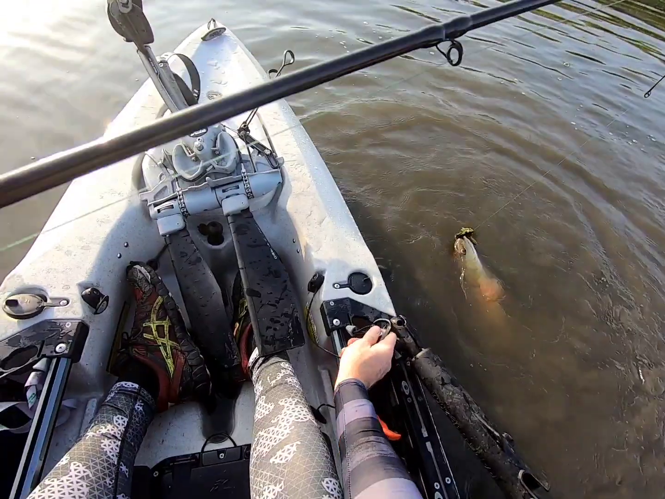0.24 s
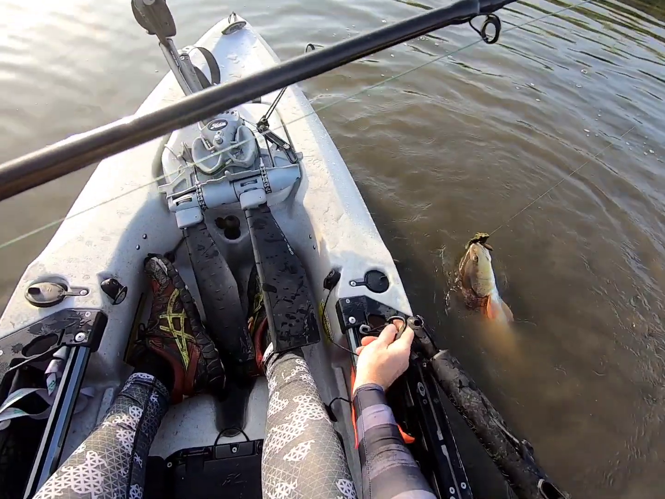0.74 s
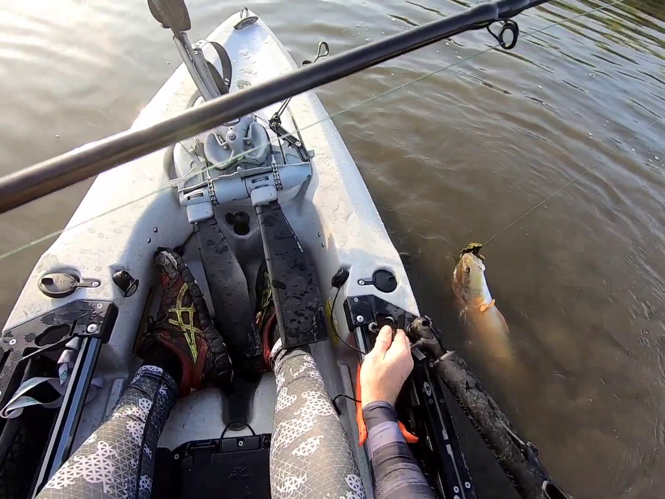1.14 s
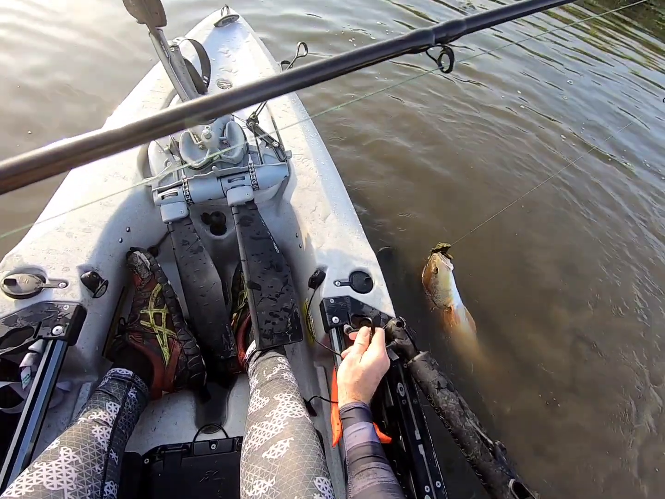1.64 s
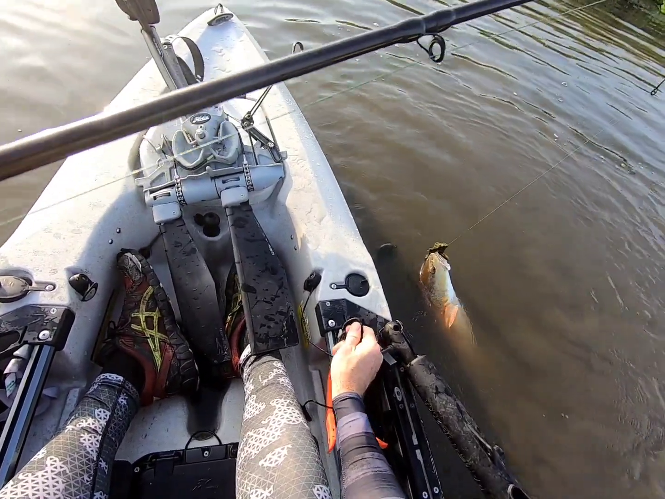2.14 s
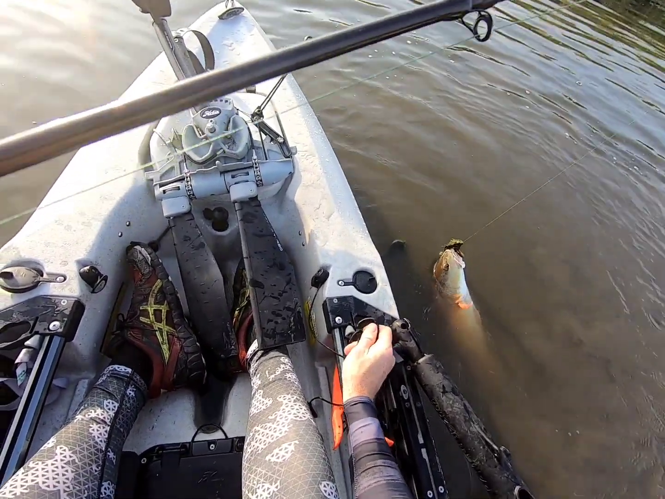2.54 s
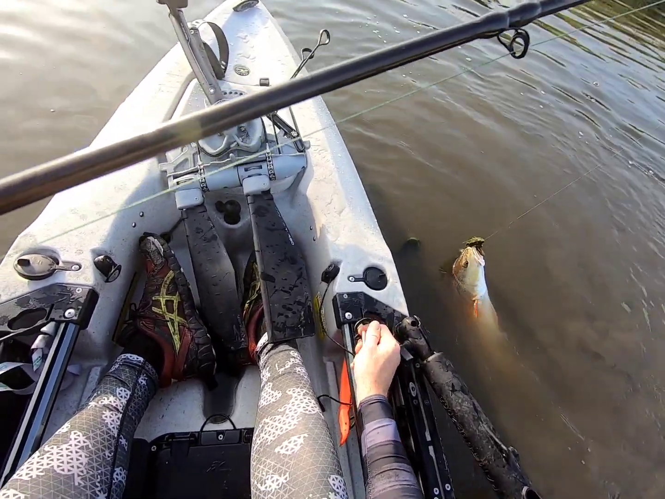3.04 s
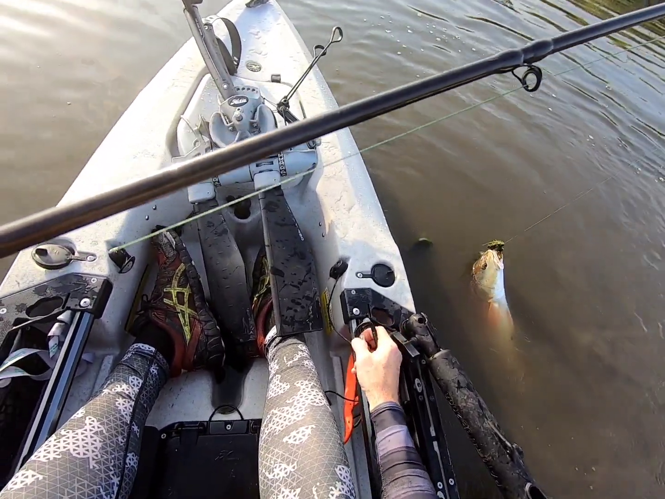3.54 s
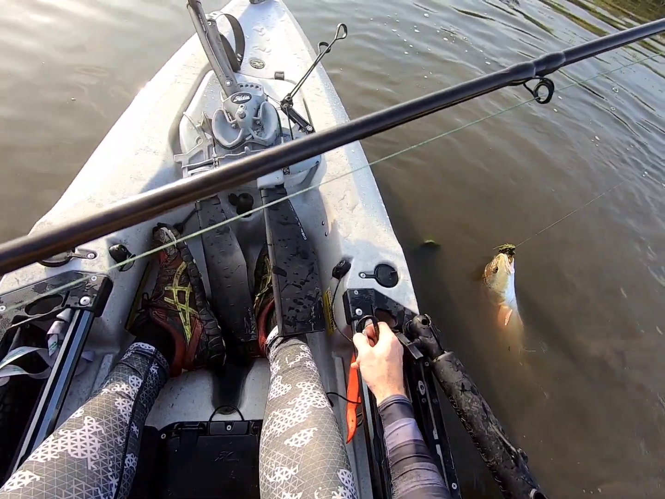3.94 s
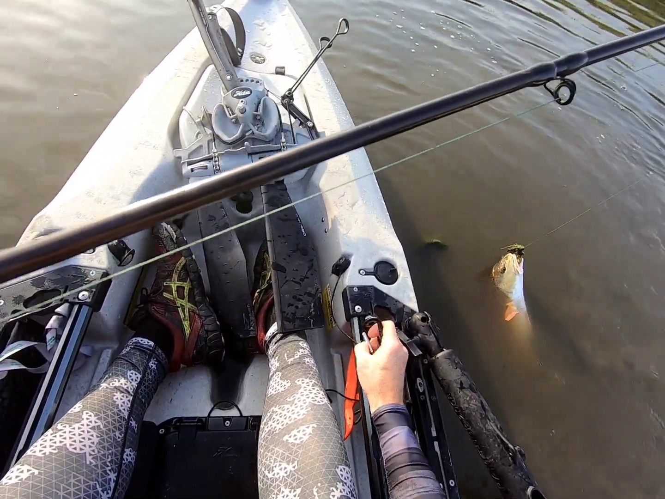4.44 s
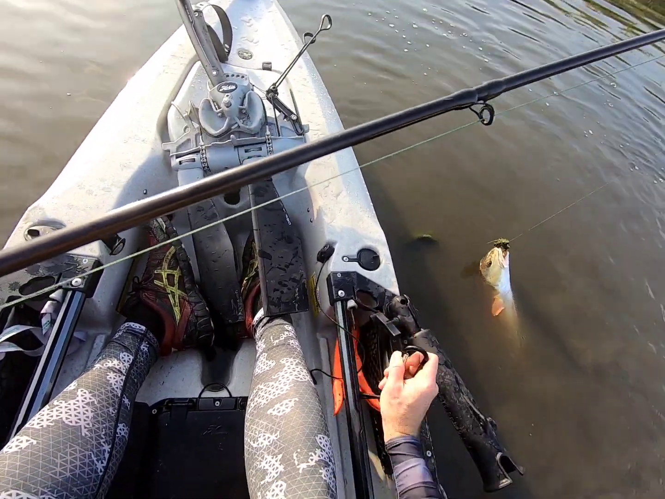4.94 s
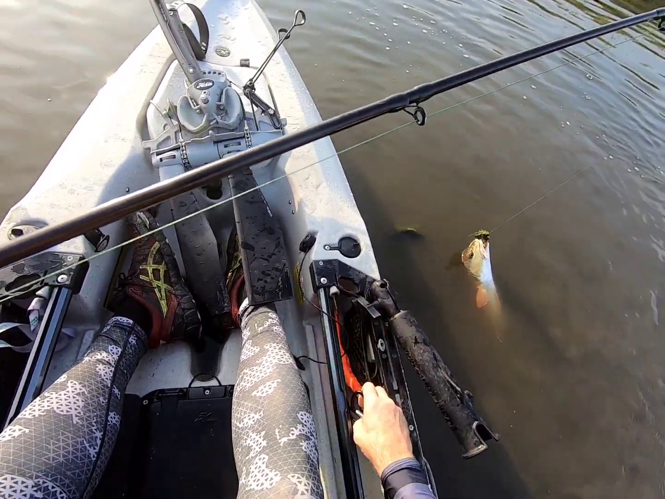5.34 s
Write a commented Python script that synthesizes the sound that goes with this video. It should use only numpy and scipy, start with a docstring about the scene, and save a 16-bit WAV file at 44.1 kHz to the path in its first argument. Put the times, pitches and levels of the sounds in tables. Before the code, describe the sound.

Outdoors on calm water, a dense insect chorus holds one thin, high pitch, stronger on the right. Wind thumps low and unevenly, mostly on the left of a close, body-worn-style stereo microphone. Small knocks, ticks and cloth rubs come from a plastic kayak, with a few watery plips. Activity thins mid-way, then rummaging builds to a loud double clunk at the very end.

```python
"""On a marsh, a kayak drifts amid a dense insect chorus near 7 kHz, heard mostly to the right.
Narrow-band noise makes the chorus; low noise and single pulses make wind buffet the microphone ports.
Filtered noise makes the rustle of an angler's sleeve, the hush of the marsh and water under the hull.
Damped sines ring as drops, ticking tackle and the plastic hull, which gear scrapes and knocks,
hardest at the end."""
import sys
import numpy as np
from scipy import signal
from scipy.fft import rfft, irfft, next_fast_len
from scipy.io import wavfile
from scipy.ndimage import uniform_filter1d, map_coordinates

SR = 44100
rng = np.random.default_rng(int(sys.argv[2]) if len(sys.argv) > 2 else 0)


def unload_audio(sound):
    """Save the sound as a 16-bit wav file, at the path given as the first command line argument."""
    columns = np.transpose(np.atleast_2d(sound))
    # keep every value between -1 and 1, then stretch to whole-number steps
    steps = np.round(np.clip(columns, -1, 1) * 32767)
    wavfile.write(sys.argv[1], SR, steps.astype(np.int16))


N = 246367
TIME = np.arange(N) / SR  # the whole scene, s
AFTER = np.arange(SR // 6) / SR  # time since a single event, s


def amp(db):
    """Level: decibels to an amplitude gain."""
    return 10 ** (np.asarray(db) / 20)


def unit(x):
    """Normalisation: x at rms 1."""
    return x / np.sqrt(np.mean(x ** 2) + 1e-20)


def curves(rows):
    """Linear interpolation: one value per sample for each column after the time."""
    seconds, *columns = np.transpose(rows)
    return [np.interp(TIME, seconds, column) for column in columns]


def wobble(rate):
    """Slow modulation: a smooth random curve with rate knots a second."""
    knots = rng.standard_normal(int(N * rate / SR) + 4)
    return map_coordinates(knots, [TIME * rate])


def pan(db):
    """Constant-power panning: gains for a left minus right level difference."""
    gains = amp(np.array([db, -db]).reshape(2, -1) / 2)
    return gains / np.sqrt(np.mean(gains ** 2, axis=0))


def filtered(x, response):
    """Linear filtering: x multiplied by a response in the frequency domain."""
    n = x.shape[-1]
    padded = next_fast_len(n + SR // 4)
    hz = np.fft.rfftfreq(padded, 1 / SR)
    return irfft(rfft(x, padded) * response(hz), padded)[..., :n]


def noise(spectrum, alike, size=N):
    """Coloured noise: stereo, rms 1, mixed from mid and side to a left-right correlation."""
    hz, db = np.transpose(spectrum)

    def colour(f):
        return amp(np.interp(np.log(f + 1), np.log(hz + 1), db, left=-120, right=-120))

    mid, side = filtered(rng.standard_normal((2, size)), colour)
    turn = np.arccos(np.clip(alike, -1, 1)) / 2
    return unit(np.cos(turn) * mid + np.sin(turn) * np.array([side, -side]))


def patchy(x, depth_db):
    """Time-frequency modulation: brief random swells shared by neighbouring frequencies."""
    bins = signal.stft(x, nperseg=256)[2]
    field = rng.standard_normal(bins.shape[1:])
    field = uniform_filter1d(field, size=4, axis=0)
    field = uniform_filter1d(field, size=14, axis=1)
    return signal.istft(bins * amp(depth_db * unit(field)), nperseg=256)[1][:, :N]


def fade(t, t60):
    """Exponential decay: 60 dB in t60 seconds."""
    return np.exp(-np.log(1000) * t / t60)


def held(start, end, rise_s, fall_s):
    """Exponential envelope: builds about 50 dB in rise_s, holds, dies about 60 dB in fall_s."""
    end = max(start, end)
    corners = [start - 2 * rise_s, start, end, end + 2 * fall_s]
    log_gain = np.log(1000) * np.array([-1.65, 0.009, -0.0041, -2.03])
    return np.exp(np.interp(TIME, corners, log_gain))


def ring(hz, t60, attack, delay=0, glide=0):
    """Damped oscillation: a sine with a soft start after a delay, gliding in octaves a second."""
    t = np.maximum(AFTER - delay, 0)
    swing = np.sin(2 * np.pi * hz * t * 2 ** (glide * t / 2))
    return swing * fade(t, t60) * (1 - np.exp(-t / attack))


def add(track, s, sound):
    """Superposition: mix a sound into the track at s seconds."""
    part = track[:, max(round(s * SR), 0):][:, :sound.shape[-1]]
    part += sound[..., :part.shape[1]]


CHORUS_DB, CHORUS_LEAN_DB = -41.5, -5  # level, left minus right
# Spread of the insects' pitches. Each row: frequency in Hz, relative density in dB per Hz.
SONG_SPECTRUM = [(5000, -48), (5600, -35.5), (6000, -24), (6300, -13), (6500, -5.5), (6790, 0),
                 (6860, -2.5), (6925, 0.5), (7100, -7.5), (7250, -17.5), (7500, -28.5), (7750, -38.5),
                 (8200, -40.5), (8800, -55.5)]


def insects():
    """Incoherent summation: countless singers, each a little off pitch, merge into one narrow band."""
    level = amp(CHORUS_DB + 0.17 * wobble(5.3))
    return level * pan(CHORUS_LEAN_DB) * noise(SONG_SPECTRUM, alike=-0.21)


GUST_RISE_S, GUST_FALL_S = 0.14, 0.26  # time to build by about 50 dB, to die by about 60 dB
WAKE_DB, WAKE_S = -13.5, 0.68  # stirred air around a gust of one second, and its 60 dB fall time
# Gusts on the ports. Each row: start in seconds, end in seconds, swell level in dB,
# left minus right in dB, quick buffet over slow swell in dB.
GUST_ROWS = [(0.0, 0.108, -45.5, -7.5, 3), (0.318, 0.358, -51.5, 1.5, -4.5), (0.712, 1.036, -36.5, -11, 0),
             (1.133, 1.36, -43.5, -5, 1.5), (1.424, 1.557, -45, -17, -1), (1.614, 1.803, -43.5, -15, -4),
             (1.979, 2.19, -52, -5.5, 5), (2.245, 2.35, -63, 4, 0.5), (2.467, 2.486, -48, -14, -0.5),
             (3.288, 3.327, -48, -14.5, -7), (3.631, 3.666, -55, 1, -7.5), (3.816, 3.851, -38, -8.5, -16.5),
             (4.592, 4.675, -41, 4, -18), (4.677, 4.844, -38.5, 5, 0), (5.05, 5.25, -58, -5, -8),
             (5.27, 5.364, -48, -6.5, 2.5), (5.403, 5.59, -38.5, -9, 5.5)]


def gusts():
    """Power addition: gusts and their wakes set swell and buffet; longer gusts stir more air."""
    swell, buffet = np.zeros((2, 2, N))
    for start, end, db, lean_db, buffet_db in GUST_ROWS:
        wake = amp(WAKE_DB) * np.sqrt(abs(end - start)) * held(start, end, WAKE_S / 2, WAKE_S)
        envelope = np.maximum(held(start, end, GUST_RISE_S, GUST_FALL_S), wake)
        power = (amp(db) * pan(lean_db)) ** 2 * envelope ** 2
        swell += power
        buffet += power * amp(buffet_db) ** 2
    return np.sqrt(swell), np.sqrt(buffet)


# Slow swell of the wind. Each row: frequency in Hz, relative density in dB per Hz.
SWELL_SPECTRUM = [(14, -18.5), (25, -5.5), (36, -1), (50, -3.5), (70, -17), (130, -38)]
# Quick buffeting of the wind. Each row: frequency in Hz, relative density in dB per Hz.
BUFFET_SPECTRUM = [(35, -20.5), (60, 3), (85, -0.5), (125, -7.5), (180, -14), (280, -41.5), (500, -45)]
# Single eddies that hit a port. Each row: centre in seconds, level in dB, frequency in Hz,
# left minus right in dB.
EDDY_ROWS = [(0.046, -31, 70, -24), (0.794, -31.5, 130, -7), (0.815, -31, 85, -14),
             (0.84, -26.5, 92.5, -22), (1.308, -27, 116, -26), (1.323, -26.5, 132, -22),
             (1.426, -36.5, 122, -25), (1.637, -29.5, 102, -20), (2.011, -29.5, 106, -24),
             (2.137, -39.5, 110, -2), (2.155, -40, 100, -7), (4.672, -31.5, 108, 16), (4.722, -19, 45, -23),
             (4.794, -26, 145, 29), (4.813, -23, 81, 6), (5.409, -23, 109, -17), (5.458, -14.5, 112, -30)]


def wind(swell, buffet):
    """Turbulence: lumpy noise that differs between the ports; a strong eddy is one push and pull."""
    lumps = amp(3.7 * np.array([wobble(25), wobble(25.07)]))
    out = swell * noise(SWELL_SPECTRUM, alike=0.15)
    out += buffet * unit(lumps * noise(BUFFET_SPECTRUM, alike=0.43))
    middle = AFTER[-1] / 2
    for s, db, hz, lean_db in EDDY_ROWS:
        phase = (np.pi * hz * (AFTER - min(s, middle))) ** 2
        pulse = (2 * phase - 1) * np.exp(-phase)
        add(out, s - middle, amp(db) * pan(lean_db) * pulse)
    return out


RUB_RISE_S, RUB_FALL_S = 0.089, 0.16  # time to build by about 50 dB, to die by about 60 dB
RUSTLE_GAIN_DB = 10.0  # raises the strokes and the reach's rustle alike
# Strokes of the sleeve. Each row: start in seconds, end in seconds, level in dB before that gain.
STROKES = [(0.0, 0.387, -74.5), (0.149, 0.234, -65.5), (0.553, 0.732, -64.5), (0.743, 0.775, -56),
           (0.804, 1.09, -71.5), (2.204, 2.304, -76.5), (2.38, 2.434, -72), (2.876, 2.91, -70.5),
           (5.294, 5.304, -58)]
# The arm reaches back: its rubbing comes and goes, and is loudest at the end. Each row: time in
# seconds, rustle level in dB before that gain, level of its low body in dB.
REACH_LEVELS = [(4.45, -100, -100), (4.55, -90, -61), (4.8, -71.5, -69), (4.86, -64, -44), (4.97, -65, -51),
                (5.07, -66.5, -58), (5.17, -61.5, -53.5), (5.25, -62, -70), (5.33, -62.5, -56),
                (5.37, -58, -43.5), (5.59, -52, -40)]
# Rustle of the cloth. Each row: frequency in Hz, relative density in dB per Hz.
CLOTH_SPECTRUM = [(100, -9), (180, 10.5), (320, 4.5), (480, -5.5), (800, -4), (1200, -10.5), (1750, -10),
                  (2400, -16), (3500, -13.5), (4500, -20.5), (8000, -34), (15000, -52.5)]
# Low body of the rubbing. Each row: frequency in Hz, relative density in dB per Hz.
BODY_SPECTRUM = [(110, -23), (200, 0), (320, 4.5), (430, -13), (560, -18.5), (900, -23), (1400, -36.5)]


def sleeve():
    """Stick-slip friction: cloth catches and slips in small uneven grains, in strokes and one reach."""
    reach_db, body_db = curves(REACH_LEVELS)
    power = amp(reach_db) ** 2
    for start, end, db in STROKES:
        power += (amp(db) * held(start, end, RUB_RISE_S, RUB_FALL_S)) ** 2
    grain = amp(1.3 * wobble(220) + 0.84 * wobble(49))
    cloth = unit(grain * patchy(noise(CLOTH_SPECTRUM, alike=0.62), depth_db=3))
    rustle = np.sqrt(power) * amp(RUSTLE_GAIN_DB) * cloth
    return rustle + amp(body_db) * unit(grain * noise(BODY_SPECTRUM, alike=1.0))


RIPPLE_DB, CALM_DB = -19.5, -70  # water under the hull: relative to the buffeting, and at rest
SLOSH_DB, SLOSH_S = -25, 0.54  # water stirred by a blow, relative to it, and its 60 dB time
SPLASH_S, SPLASH_DB, SPLASH_WIDTH_S = 4.06, -54, 0.037  # one brief splash: crest, level, width
# Water murmuring in the hollow hull. Each row: frequency in Hz, relative density in dB per Hz.
HOLLOW_SPECTRUM = [(90, -19.5), (180, 6.5), (320, 5.5), (450, -12.5), (600, -14), (820, -13.5), (1150, -22),
                   (1800, -32)]
# Drops that trap a bubble. Each row: start in seconds, relative level in dB, frequency in Hz,
# 60 dB decay time in seconds, pitch glide in octaves a second.
DROP_ROWS = [(0.254, -54, 1425, 0.041, 6), (0.314, -44.5, 1356, 0.052, -10.5), (0.72, -52, 644, 0.051, 12),
             (0.835, -48, 697, 0.051, -3), (1.026, -33.5, 947, 0.031, 1), (1.0236, -29.5, 466, 0.028, 26),
             (1.055, -52.5, 529, 0.14, -0.5), (4.033, -34, 890, 0.043, -3.5)]
# Fizz of the splash. Each row: frequency in Hz, relative density in dB per Hz.
SPRAY_SPECTRUM = [(500, 17.5), (2500, 5.5), (5000, 3), (8000, 8), (12000, -6.5), (15500, -7)]


def water(buffet):
    """Bubble resonance: drops ring, gusts and blows stir a murmur in the hull, a splash fizzes."""
    power = amp(CALM_DB) ** 2 + amp(RIPPLE_DB) ** 2 * np.mean(buffet ** 2, axis=0, keepdims=True)
    settling = fade(TIME[:SR], SLOSH_S)
    for s, db, *_ in BLOWS:
        add(power, s, (amp(db + SLOSH_DB) * settling) ** 2)
    out = np.sqrt(power) * unit(amp(2.1 * wobble(40)) * noise(HOLLOW_SPECTRUM, alike=0.83))
    for s, db, hz, t60, glide in DROP_ROWS:
        bubble = ring(hz, t60, attack=0.0019, glide=glide)
        add(out, s, amp(db + 4.5) * pan(-5.0) * bubble)
    spray = amp(SPLASH_DB) * np.exp(-((TIME - SPLASH_S) / SPLASH_WIDTH_S) ** 2)
    return out + spray * unit(amp(1.5 * wobble(540)) * noise(SPRAY_SPECTRUM, alike=0.39))


# Open air over the water. Each row: frequency in Hz, relative density in dB per Hz.
AIR_SPECTRUM = [(25, -17), (45, -3.5), (110, -10), (165, 1.5), (320, -7), (560, -24), (780, -17.5),
                (1200, -25), (1700, -24), (2400, -26.5), (5000, -28.5), (7000, -56.5)]
# Distant reeds. Each row: frequency in Hz, relative density in dB per Hz.
REED_SPECTRUM = [(300, -11), (520, -5.5), (780, 1), (1150, -10), (1750, -13), (2600, -29.5)]
# Faint high hiss. Each row: frequency in Hz, relative density in dB per Hz.
HISS_SPECTRUM = [(3000, -7.5), (5000, -3), (8000, -16), (11000, -4), (15500, -9.5)]
# Course of that hiss. Each row: time in seconds, level in dB.
HISS_COURSE = [(0, -77), (0.85, -77), (1.4, -85), (2.95, -87), (3.6, -80), (5.59, -80.5)]


def air():
    """Diffuse sound: open air, a very wide rush of reeds and a thin, decorrelated hiss on top."""
    hiss_db, = curves(HISS_COURSE)
    hush = amp(-66.5) * noise(AIR_SPECTRUM, alike=0.34) + amp(-68) * noise(REED_SPECTRUM, alike=-0.86)
    drift = amp(1.7 * wobble(2.4) - 0.7)
    return drift * patchy(hush, depth_db=2) + amp(hiss_db) * noise(HISS_SPECTRUM, alike=0.023)


LAPS_PER_S, LAP_DB, LAP_SCATTER_DB = 2, -61, 2  # wavelets that pat the hull at random


def laps():
    """Random arrivals: faint, soft pats of wavelets, one in each equal slot, as rows like the blows."""
    count = round(LAPS_PER_S * N / SR)
    slot_s = N / SR / count
    return [((k + rng.random()) * slot_s, rng.normal(LAP_DB, LAP_SCATTER_DB), 0, 0, 0.004)
            for k in range(count)]


ZIP_S, ZIP_END_S, ZIP_DB = 0.18, 0.2, -51  # start, end, level
ZIP_HZ, ZIP_RISE_HZ_PER_S = 7330, 6000


def chirp():
    """Frequency modulation: a single brief note on the right rises just above the chorus."""
    hz = ZIP_HZ + ZIP_RISE_HZ_PER_S * (np.clip(TIME, ZIP_S, ZIP_END_S) - ZIP_S) + 80 * wobble(500)
    note = unit(np.sin(2 * np.pi * np.cumsum(hz) / SR))
    return amp(ZIP_DB) * pan(-12) * held(ZIP_S, ZIP_END_S, 0.04, 0.03) * note


CLICK_DB, SOFT_DB = -14.5, -34  # click relative to the hardest blow; how much weaker for the softest
CLICK_T60_S = 0.054
WAVE_LIFT_DB = 2  # a hard blow puts more of its force into the first wave
FRONT_HZ = 7000  # the highest, fastest part of that wave
SPOT_DETUNE = 0.041  # how far the spot that is struck shifts each mode, as a fraction
PORT_SPREAD_CYCLES = 0.066  # how unevenly a mode reaches the two ports
# Blows and slaps on the hull. Each row: start in seconds, relative level in dB, hardness from 0 to 1,
# weight of the lowest modes in dB, travel time through the shell at 1 kHz in seconds.
BLOWS = [(0.211, -53, .05, 14, 0.0049), (0.584, -46.5, 0.4, 7, 0.0035), (0.683, -36.5, 0.88, -3, 0.0059),
         (0.7414, -26.5, 0.75, 0.5, 0.004), (0.797, -38, .05, 2.5, 0.0058), (0.865, -37, 0.62, -3, .005),
         (1.202, -41, 0.1, -16, 0.0032), (1.561, -39.5, 0, -8, 0.0037), (1.674, -53.5, 0, -4, 0.0045),
         (1.714, -53, 0.03, -8, 0.0038), (1.962, -51.5, .05, 6, 0.004), (1.996, -47.5, 0.3, -5, .005),
         (2.059, -44.5, 0.2, -2.5, 0.0035), (2.21, -51.5, .3, 3, 0.0049), (2.281, -58, .8, 1, 0.0042),
         (2.362, -34.5, 0.51, 2, .002), (2.4139, -35, 0.69, -6, 0.0033), (2.439, -43.5, 0.3, -2.5, 0.0041),
         (3.099, -47, 0.4, -3.5, 0.0042), (4.0293, -29, 0.8, -8, .005), (4.045, -39.5, .05, 3, 0.0029),
         (4.138, -45.5, 0.3, -12, 0.0045), (4.174, -55.5, .1, 0, .004), (4.253, -50, 0.97, 5, 0.0054),
         (4.282, -38.5, .05, -5, 0.0042), (4.535, -50, .05, 3.5, 0.0045), (4.567, -40, 0.1, -5, 0.0031),
         (4.591, -40.5, 0.2, -10, .002), (4.611, -37, 0.1, -7, 0.00291), (4.692, -45.5, 0.63, 0, 0.0041),
         (4.864, -41, 0.5, -11, 0.0041), (4.957, -42.5, .4, -12, 0.0039), (5.108, -46.5, .5, 7, 0.0038),
         (5.277, -30, 0.97, -11, 0.0035), (5.297, -31, 1, -9, 0.0029), (5.342, -34.5, 0.84, -3, 0.0038),
         (5.355, -29.5, 0.77, -6.5, 0.0052), (5.385, -36.5, 0.97, -13, .005),
         (5.404, -29.5, 0.1, -2, 0.0037), (5.455, -36, .65, -1, 0.0038), (5.4902, -5.5, 0.75, -6.5, 0.0035),
         (5.511, -11.5, 0.85, -3, 0.0021)]
# Modes of the hull. Each row: frequency in Hz, relative level in dB, 60 dB decay time in seconds.
HULL_MODES = [(197.4, -5.5, 0.089), (267.6, -7.5, 0.077), (312.4, -1, 0.087), (388, -5, 0.086),
              (524.7, -7, 0.092), (715, -5.5, 0.052), (829.5, -2, 0.049), (1003, -5.5, 0.048),
              (1147, 4, 0.0068), (1637, 1.5, 0.02), (2360, -1.5, 0.012), (3040, -1.5, 0.0072),
              (3650, -14, 0.013)]
# First bending wave. Each row: frequency in Hz, relative level in dB.
BEND_RESPONSE = [(80, -27), (200, -1), (400, -0.5), (850, 0.5), (1500, -1), (2550, 9), (3700, 3),
                 (4600, -11.5), (7000, -24)]
# Contact noise. Each row: frequency in Hz, relative density in dB per Hz.
CRACK_SPECTRUM = [(300, -11), (900, 11.5), (2000, 7), (3600, -0.5), (4500, -12.5), (8000, -20.5),
                  (15000, -59)]


def hull():
    """Dispersion: bending waves cross the shell treble first and wake each mode; hard blows are brighter."""
    out = np.zeros((2, N))
    bend_hz, bend_db = np.transpose(BEND_RESPONSE)
    force_hz = [259, 463, 882, 2030]
    for s, knock_db, hardness, weight_db, travel_s in BLOWS + laps():
        click_db = knock_db + CLICK_DB + SOFT_DB * (1 - min(hardness, 1))
        force_levels = [knock_db + weight_db, knock_db - 9.5, knock_db - 9.0, click_db - 3.0]

        def force_db(hz):
            return np.interp(np.log(hz), np.log(force_hz), force_levels)

        # bending speed grows with the root of frequency, so the pitch sweeps down
        front_s = travel_s * np.sqrt(1000 / FRONT_HZ)
        sweep_hz = FRONT_HZ * (front_s / (front_s + AFTER)) ** 2
        sweep_db = force_db(sweep_hz) + np.interp(np.log(sweep_hz), np.log(bend_hz), bend_db)
        low_cut = np.minimum(sweep_hz / bend_hz[0], 1) ** 2
        wave = amp(sweep_db) * low_cut * np.sin(2 * np.pi * np.cumsum(sweep_hz) / SR)
        crack = fade(AFTER, CLICK_T60_S) * noise(CRACK_SPECTRUM, alike=0.81, size=len(AFTER))
        blow = amp(WAVE_LIFT_DB * hardness) * pan(-1.2) * wave + amp(click_db + 3.0) * crack
        for hz, db, t60 in HULL_MODES:
            pitch = hz * (1 + SPOT_DETUNE * rng.standard_normal())
            # each port hears its own part of the shell
            port_lag = PORT_SPREAD_CYCLES * rng.standard_normal((2, 1)) / hz
            arrival = front_s * (np.sqrt(FRONT_HZ / hz) - 1) + port_lag
            mode = ring(pitch, t60, attack=.5 / hz, delay=arrival)
            blow = blow + amp(db + force_db(hz)) * pan(rng.normal(-1.2, 3.0)) * mode
        add(out, s, blow)
    return filtered(out, lambda hz: 1 / (1 + (hz / 7500) ** 4))  # soft plastic swallows the top


SLIPS_PER_S, SCRAPE_Q = 600, 2.2  # rate of the slips, sharpness of their ring
SCRAPE_EDGE_S = 0.033  # time to build by about 50 dB or die by about 60 dB
# Gritty scrapes of gear along the hull. Each row: start in seconds, end in seconds, level in dB,
# centre frequency in Hz.
SCRAPE_ROWS = [(0.555, 0.555, -65, 1590), (0.63, 0.641, -68, 1290), (0.73, 0.734, -59, 2700),
               (0.757, 0.763, -59, 2380), (2.424, 2.43, -68, 2420), (2.87, 2.883, -65, 2700),
               (4.064, 4.088, -63, 2300), (4.832, 4.896, -69, 3400), (4.974, 4.983, -65, 1890),
               (5.157, 5.168, -59, 2500), (5.2, 5.213, -61, 1650), (5.383, 5.382, -53.5, 2400),
               (5.435, 5.437, -53, 1820), (5.474, 5.492, -54, 3360), (5.536, 5.554, -53, 3330)]


def scrapes():
    """Stick-slip excitation: gear slips at random along the hull, each slip ringing one broad resonance."""
    out = np.zeros((2, N))
    for start, end, db, hz in SCRAPE_ROWS:
        slipping = rng.random(N) < SLIPS_PER_S / SR
        slips = slipping * (rng.standard_normal(N) + 0.51 * rng.standard_normal((2, N)))

        def resonance(f):
            return (1j * f * hz / (SCRAPE_Q * (hz ** 2 - f ** 2) + 1j * f * hz)) ** 2

        grit = unit(filtered(slips, resonance))
        out += amp(db) * held(start, end, SCRAPE_EDGE_S, SCRAPE_EDGE_S) * grit
    return out


TICK_T60_S, STRIKE_T60_S = 0.012, 0.006  # decay of a tick's main mode and of its bright upper mode
REBOUND_S, REBOUND_DB = 0.0027, -7  # a ticking part lands again after roughly this time
# contact noise of a tick, its faint tail and the tail's 60 dB time
CHATTER_DB, CHATTER_TAIL_DB, CHATTER_TAIL_S = -16, -22, 0.1
SNAP_T60_S = 0.01
# Ticks of the tackle. Each row: start in seconds, relative level in dB, ring frequency in Hz.
TICK_ROWS = [(0.664, -41, 3200), (0.7198, -29, 2800), (0.7415, -24.5, 1490), (0.7457, -39, 2600),
             (0.976, -43.5, 3300), (1.024, -48, 2600), (1.7646, -42, 2920), (2.133, -46, 3100),
             (2.4145, -50, 1740), (2.552, -50.5, 3050), (2.8797, -22, 2466), (2.911, -50, 1350),
             (3.312, -42, 2050), (4.0292, -41, 2150), (4.0707, -26, 2610), (5.183, -42, 2120),
             (5.23, -40, 1800), (5.278, -37, 1840), (5.2945, -32, 2660), (5.38, -33, 1800),
             (5.428, -42, 1770), (5.49, -9.5, 2310), (5.504, -31, 3450), (5.5113, -16.5, 2700)]
# Small parts scuffing. Each row: frequency in Hz, relative density in dB per Hz.
CLINK_SPECTRUM = [(400, -15), (800, -3), (1500, -5), (2500, 3.5), (3700, -3), (4700, -19), (8000, -38.5),
                  (15000, -51)]
# Sharp, bright snaps. Each row: start in seconds, relative level in dB, brightest frequency in Hz.
SNAP_ROWS = [(0.6693, -53.5, 7500), (1.6057, -59.5, 9500), (3.599, -54, 8000), (4.0712, -35.5, 7400),
             (4.5317, -45.5, 8000), (4.575, -43.5, 8000), (5.4908, -20.5, 4250)]


def tackle():
    """Impact and rebound: small hard parts ring a pair of modes twice; the sharpest contacts snap."""
    out = np.zeros((2, N))
    for s, db, hz in TICK_ROWS:
        def tone(delay):
            main = ring(hz, TICK_T60_S, attack=0.00043, delay=delay)
            return main + 1.37 * ring(hz * 1.237, STRIKE_T60_S, attack=0.00035, delay=delay)

        rebound_s = np.round(REBOUND_S * hz) / hz  # it lands again in step with its own swing
        tones = tone(0) + amp(REBOUND_DB) * tone(rebound_s)
        dying = fade(AFTER, TICK_T60_S) + amp(CHATTER_TAIL_DB) * fade(AFTER, CHATTER_TAIL_S)
        onset = 1 - fade(AFTER, 0.0027)
        chatter = dying * onset * noise(CLINK_SPECTRUM, alike=0.7, size=len(AFTER))
        add(out, s, amp(db - 9) * tones + amp(db + CHATTER_DB) * chatter)
    for s, db, hz in SNAP_ROWS:
        colour = [(0.45 * hz, -24), (hz, 0), (1.62 * hz, -15), (2.4 * hz, -36), (3 * hz, -60)]
        snap = noise(colour, alike=0.26, size=len(AFTER))
        add(out, s, amp(db - 3.5) * fade(AFTER, SNAP_T60_S) * snap)
    return out


# Low booms of one panel mode under a bump and the final hard blows. Each row: start in seconds,
# peak level in dB, frequency in Hz, 60 dB decay time in seconds.
BOOM_ROWS = [(5.279, -24.5, 198.3, 0.079), (5.4925, -11.5, 288, 0.032), (5.514, -11.5, 212.5, 0.043)]
# Gear left ringing by hard blows. Each row: start in seconds, level in dB, frequency in Hz,
# 60 dB decay time in seconds.
GEAR_RINGS = [(5.297, -41, 954, 0.056), (5.357, -36.5, 497, 0.12), (5.36, -35, 309, 0.07),
              (5.493, -22, 510, 0.07), (5.512, -36, 1020, 0.17), (5.514, -28, 385, 0.17)]


def booms():
    """Modal resonance: a blow swells the panel over a few cycles; hard blows leave gear ringing."""
    out = np.zeros((2, N))
    for s, db, hz, t60 in BOOM_ROWS:
        swing = ring(hz, t60, attack=0.025)
        add(out, s, amp(db) * pan(-1) * swing / np.abs(swing).max())
    for s, db, hz, t60 in GEAR_RINGS:
        add(out, s, amp(db) * pan(-1) * ring(hz, t60, attack=.5 / hz))
    return out


def scene():
    """Superposition in a free field: every source adds in the open, with no room around it."""
    swell, buffet = gusts()
    background = insects() + wind(swell, buffet) + sleeve() + water(buffet) + air()
    return background + chirp() + hull() + scrapes() + tackle() + booms()


TOP_HZ = 15700  # upper band limit


def record(dry):
    """Band limiting: nothing passes at or above the upper limit."""
    return filtered(dry, lambda hz: hz < TOP_HZ)


dry = scene()
out = record(dry)
unload_audio(out)
```